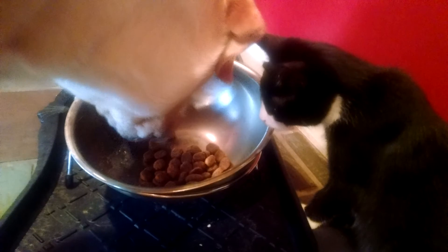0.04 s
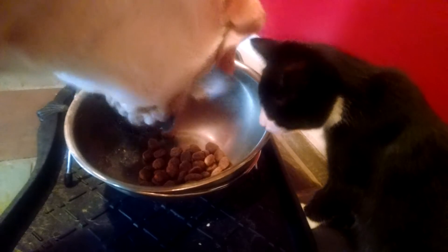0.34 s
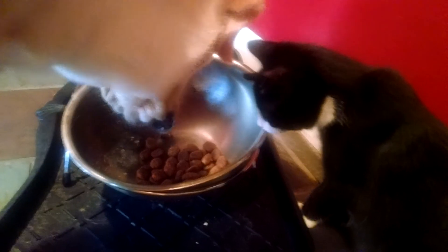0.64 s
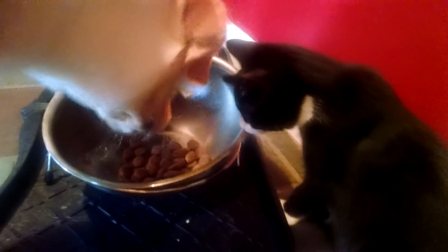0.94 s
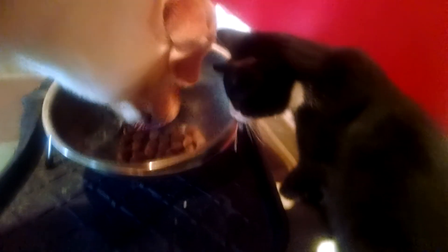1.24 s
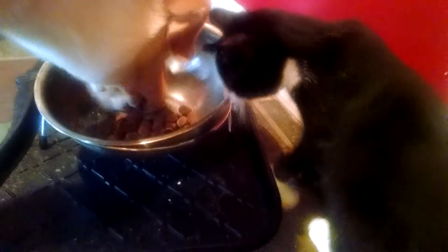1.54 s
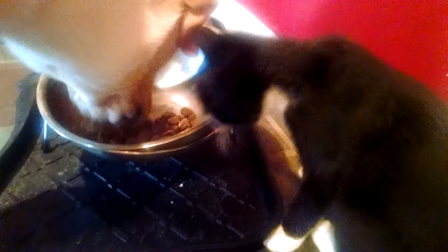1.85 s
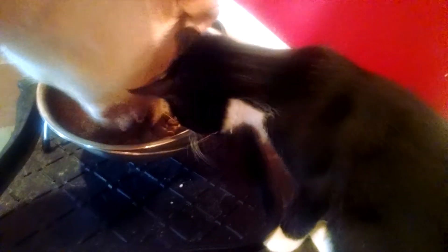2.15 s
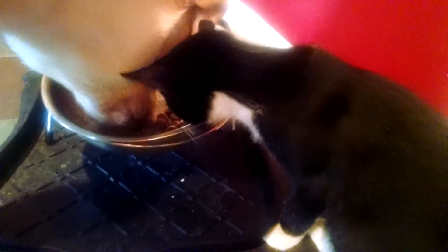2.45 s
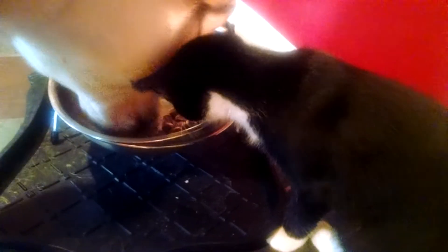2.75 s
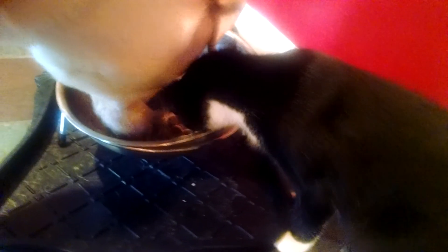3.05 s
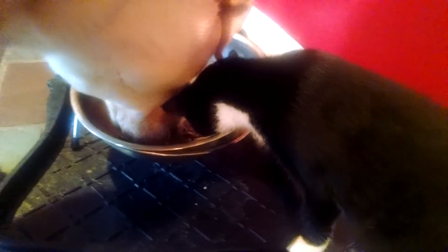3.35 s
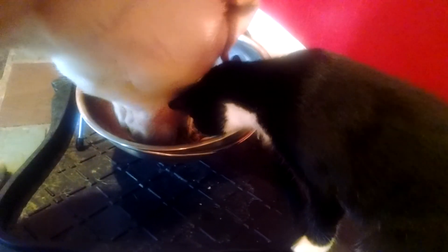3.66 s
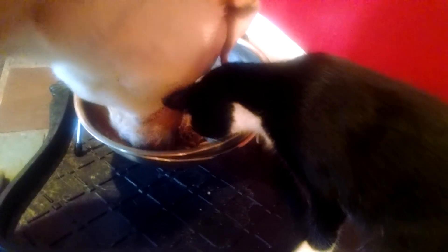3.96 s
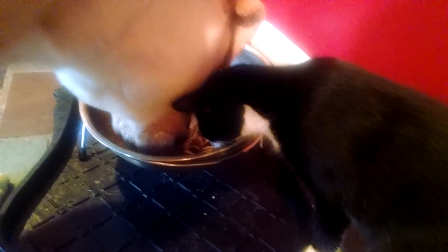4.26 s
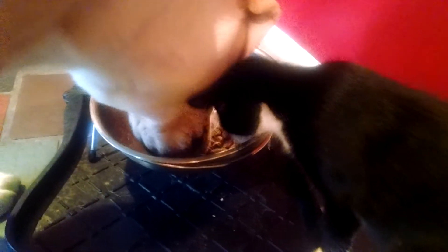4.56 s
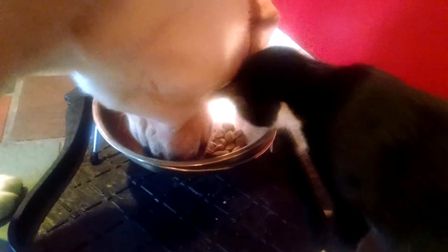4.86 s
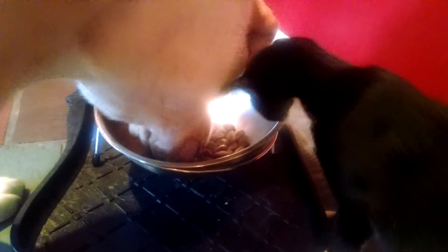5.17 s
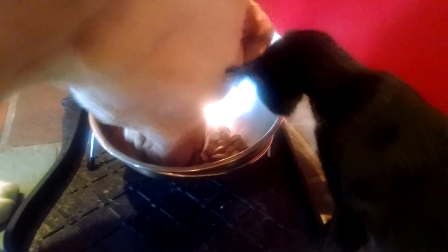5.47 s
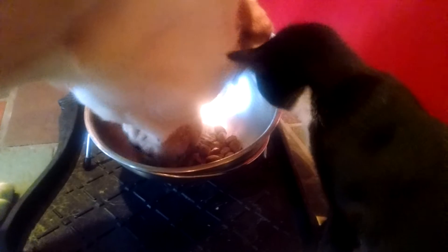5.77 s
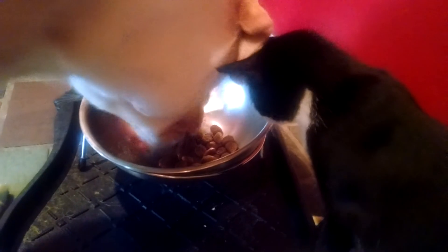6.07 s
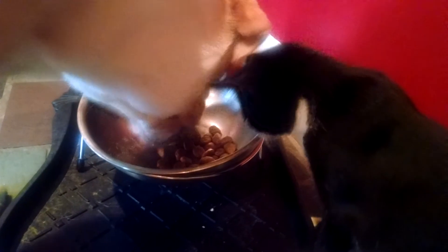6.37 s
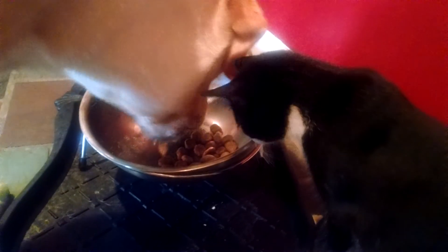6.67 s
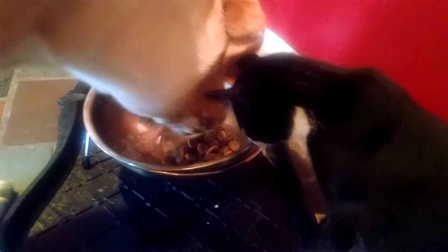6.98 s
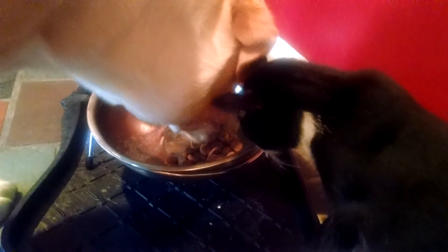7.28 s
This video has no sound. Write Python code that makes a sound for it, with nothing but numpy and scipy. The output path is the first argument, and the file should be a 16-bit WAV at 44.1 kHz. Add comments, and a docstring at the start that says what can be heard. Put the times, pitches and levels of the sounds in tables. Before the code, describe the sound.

A dog eats dry kibble from a steel bowl, close to the microphone in a small room. Wet lip clicks and soft tongue thumps come first, then crisp, irregular crunching as pellets knock, tumble and scrape against the metal with short, damped rings. One loud jaw clack lands about midway. Toward the end the crunching gives way to wet smacking. An appliance hums faintly throughout.

```python
"""A dog crunches dry kibble from a steel bowl on a mat, close to a phone in a small room.
Each pellet splits, snaps and crumbles between its teeth; its jaws clack, ringing the mouth cavity,
and saliva clicks on its lips. Pellets knock, tumble and scrape in the food-damped bowl; tongue and
fur thump and rub softly. An appliance hums behind it. The phone ducks its gain after a very loud
clack and widens the stereo image."""
import sys
import numpy as np
from scipy import signal
from scipy.fft import rfft, irfft, next_fast_len
from scipy.io import wavfile
from scipy.ndimage import uniform_filter1d

SR = 44100
rng = np.random.default_rng(int(sys.argv[2]) if len(sys.argv) > 2 else 0)


def materialize(psi):
    """Save the field psi as 16-bit PCM at rate SR to the path in sys.argv[1].

    A 1-D psi becomes a single channel; in a 2-D psi each row is a channel.
    """
    bounded = np.clip(np.atleast_2d(psi).T, -1, 1)
    quanta = np.round(bounded * 32767).astype(np.int16)
    wavfile.write(sys.argv[1], SR, quanta)


N = 332073
TIME = np.arange(N) / SR
HIT = np.arange(8192) / SR  # time within one impact [s]


def undb(db):
    """Decibels to amplitude."""
    return 10 ** (np.asarray(db) / 20)


def unit(x):
    """Scale to rms 1."""
    return x / np.sqrt(np.mean(x ** 2))


def add(track, start_s, sound):
    """Mix a sound into a track."""
    i = max(int(start_s * SR), 0)
    track[i:i + len(sound)] += sound[:N - i]


def convolve(x, response):
    """Apply an impulse response, keeping the length."""
    return signal.oaconvolve(x, response)[:len(x)]


def colour(x, points, size=4096):
    """Minimum-phase filter through (frequency [Hz], gain [dB]) points; keeps white-noise power."""
    hz, db = np.transpose(points)
    bins_hz = np.maximum(np.fft.rfftfreq(size, 1 / SR), 1)
    gain = undb(np.interp(np.log(bins_hz), np.log(hz), db))
    cepstrum = irfft(np.log(gain))
    cepstrum[1:size // 2] *= 2
    cepstrum[size // 2 + 1:] = 0
    response = irfft(np.exp(rfft(cepstrum)))
    return convolve(x, response / np.linalg.norm(response))


def grains(rate_hz, spread_db, even_s):
    """Random tiny impacts of unequal size, power held near 1 over even_s."""
    x, slots = np.zeros(N), N // 10
    chance, size, place, sign = rng.random((4, slots))
    size_db = spread_db * np.minimum(-np.log(1 - size), 2 * np.pi)
    onsets = ((np.arange(slots) + place) * 10).astype(int)
    x[onsets] = (chance < 10 * rate_hz / SR) * undb(size_db) * np.sign(sign - 0.5)
    span = int(even_s * SR)
    power = uniform_filter1d(uniform_filter1d(x ** 2, span), span)
    return x / np.sqrt(np.maximum(power, 1e-6))


def flicker(depth_db, samples):
    """Random gain, rms 1, smoothed over the given samples."""
    wander = unit(uniform_filter1d(rng.standard_normal(N), samples))
    return unit(undb(depth_db * wander))


def stroke(start_s, length_s, rise_s=0.0073, fade_s=0.026):
    """Envelope of one movement: rise up to start_s, hold, decay."""
    rise = np.clip(1 + (TIME - start_s) / rise_s, 0, 1)
    return rise * np.exp(-np.clip((TIME - start_s - length_s) / fade_s, 0, 20))


def aftermath(events, share_db, fade_s):
    """Power of the loose bits that each event sets moving."""
    kicks = np.zeros(N)
    for start_s, db, *_ in events:
        kicks[int(start_s * SR)] += undb(db + share_db) ** 2
    return signal.lfilter([1], [1, -np.exp(-2 / (fade_s * SR))], kicks)


# diffuse stereo width: (frequency [Hz], side re mid [dB])
DIFFUSE_WIDTH = [(40, 7.5), (100, -3.5), (330, -1), (700, -8), (1200, -16.5), (1900, 1.5), (2600, -11),
                 (3300, 3.5), (5000, -5), (8500, -0.5), (12800, -5.5), (15000, -6)]
def spread(mid, side):
    """Diffuse sound at two microphones, most alike in the midrange."""
    hz = np.fft.rfftfreq(len(side), 1 / SR)
    side_gain = undb(np.interp(hz, *np.transpose(DIFFUSE_WIDTH)))
    side = irfft(rfft(side) * side_gain, len(side))
    return np.array([mid + side, mid - side])


def room(x, early_db, early_t60_s, late_db, late_t60_s):
    """Direct sound, quick reflections from bowl, floor and wall, and a short tail."""
    t = TIME[:SR // 2]
    echoes = 0
    for db, t60_s in ((early_db, early_t60_s), (late_db, late_t60_s)):
        pattern = rng.standard_normal((2, len(t))) * (t > 0.0025) * undb(-60 * t / t60_s)
        echoes = echoes + undb(db) * pattern / np.linalg.norm(pattern, axis=1, keepdims=True)
    taper = 1 - (t / t[-1]) ** 2
    pair = spread(echoes[0], 1.46 * echoes[1]) * taper
    return x + np.array([convolve(x, response) for response in pair])


# room noise: (frequency [Hz], density [dB])
AIR_SPECTRUM = [(20, 0), (48, 3.5), (65, -15.5), (90, 7.5), (150, 0), (220, 6), (400, 3), (600, 8),
                (900, -2.5), (1600, -10.5), (2600, -16.5), (3600, -15), (9000, -25.5), (15200, -13.5),
                (15800, -86)]
# appliance tones: (frequency [Hz], level [dB])
HUM_TONES = [(88.5, -52), (119, -53.5), (178.5, -57), (247.6, -57.5), (359.5, -55), (470, -59),
             (586, -54.5)]
def background():
    """Steady room noise and the wavering hum of an appliance."""
    air = spread(*(colour(noise, AIR_SPECTRUM) for noise in rng.standard_normal((2, N))))
    hum = np.zeros(N)
    for hz, db in HUM_TONES:
        wander_rad = np.cumsum(rng.standard_normal(N)) * 0.01275
        hum += np.sqrt(2) * undb(db) * np.sin(2 * np.pi * hz * TIME + wander_rad)
    return undb(-45) * air + hum * np.array([[0.85], [1.1]])


# soft friction: (frequency [Hz], density [dB])
RUB_SPECTRUM = [(80, -20), (200, 10.5), (310, 11.5), (450, -2.5), (800, -3), (1300, 1), (2500, -50),
                (6000, -54)]
# rubs: (start [s], length [s], level [dB])
RUB_STROKES = [(0.378, 0.041, -44), (0.508, 0.05, -45.5), (0.595, 0.052, -58), (2.365, 0.11, -45),
               (6.2, 0.2, -48), (6.54, 0.15, -44.5), (7.024, 0.085, -46)]
def rustle(idle_db=-54.5):
    """Tongue, jowls and fur rub: single strokes over slight constant movement."""
    power = sum((undb(db) * stroke(start_s, length_s)) ** 2 for start_s, length_s, db in RUB_STROKES)
    friction = colour(grains(rate_hz=900, spread_db=1.5, even_s=0.032), RUB_SPECTRUM)
    return friction * np.sqrt(power + undb(idle_db) ** 2)


# tongue thumps: (time [s], level [dB], pitch [Hz])
TONGUE_THUMPS = [(0.384, -34.5, 620), (0.424, -36, 228), (0.597, -37, 305), (0.616, -34, 283),
                 (.646, -40, 303), (0.675, -35, 283), (.802, -32.5, 242), (.832, -40, 260),
                 (2.42, -37, 175)]
def licks():
    """The tongue lands on the food: a dull thump and a wet rub."""
    out = np.zeros(N)
    envelope = (1 - np.exp(-HIT / 0.0013)) * np.exp(-HIT / 0.012)
    envelope /= envelope.max()
    for start_s, db, hz in TONGUE_THUMPS:
        thump = np.sin(2 * np.pi * hz * HIT)
        rub = unit(colour(rng.standard_normal(len(HIT)), RUB_SPECTRUM))
        add(out, start_s, undb(db) * envelope * (0.55 * thump + 0.53 * rub))
    return out


def hollow(x, hz, width_hz):
    """Cavity resonance with a moving centre; rms 1."""
    carrier = np.exp(2j * np.pi * np.cumsum(hz) / SR)
    pole = np.exp(-np.pi * width_hz / SR)
    return unit(np.real(carrier * signal.lfilter([1], [1, -pole], x / carrier)))


# pellets dragged on steel: (start [s], length [s], level [dB], from [Hz], to [Hz])
PELLET_DRAGS = [(1.657, 0.26, -46.5, 650, 716), (2.06, 0.13, -41, 745, 660),
                (3.756, 0.046, -50.5, 720, 630), (5.359, 0.063, -39, 676, 635),
                (5.458, 0.11, -47, 724, 620), (5.82, 0.033, -38.5, 707, 624), (6.628, 0.053, -49, 704, 635)]
def scrapes():
    """Dragged pellets ring the hollow between muzzle and bowl; its pitch slides as the muzzle moves."""
    out = np.zeros(N)
    drag = grains(rate_hz=550, spread_db=-2, even_s=0.02)
    for start_s, length_s, db, from_hz, to_hz in PELLET_DRAGS:
        end_s = start_s + length_s
        span = slice(int((start_s - 0.036) * SR), int((end_s + 0.15) * SR))
        hz = np.interp(TIME[span], [start_s, end_s], [from_hz, to_hz])
        ring = hollow(drag[span], hz, width_hz=32)
        overtone = undb(-14) * hollow(drag[span], 1.42 * hz, width_hz=64)
        out[span] += undb(db) * (ring + overtone) * stroke(start_s, length_s)[span]
    return out


# loaded steel bowl: (frequency [Hz], level [dB], t60 [s])
BOWL_MODES = [(626, 1.5, 0.36), (646, 4.5, 0.16), (690, 1, 0.98), (910, -1, 0.21), (987, -1.5, 0.5),
              (1004, 11.5, 0.076), (1111, -2, 0.22), (1270, 1, 0.03), (1444, -0.5, 0.029),
              (1537, 8.5, 0.042), (1750, 6.5, 0.03), (2217, 4, 0.035)]
def bowl_ring(favoured_hz, octaves, scatter_db, damp_s):
    """One blow: the contact point weights the modes, the food soaks up the first swing."""
    hz, db, t60_s = np.transpose(BOWL_MODES)[:, :, None]
    weight, detune, polarity = rng.standard_normal((3, len(BOWL_MODES), 1))
    gain = undb(db + scatter_db * weight) / (1 + (np.log2(hz / favoured_hz) / octaves) ** 2)
    tones = np.sin(2 * np.pi * hz * (1 + 0.015 * detune) * HIT)
    modes = np.sign(polarity) * gain * undb(-60 * HIT / t60_s) * tones
    ring = modes.sum(0) * (0.2 + np.exp(-HIT / damp_s))
    return ring / np.linalg.norm(ring)


def rim_clink(start_s=4.536, peak_db=-24):
    """A tooth catches the bare, barely damped rim: a narrow group of modes sings on."""
    out = np.zeros(N)
    ring = bowl_ring(favoured_hz=1120, octaves=0.12, scatter_db=0, damp_s=0.2)
    add(out, start_s, undb(peak_db) * ring / np.abs(ring).max())
    return out


# muzzle pushes and chews: (start [s], length [s], stirring [dB], grinding [dB])
BITES = [(.2, 0.21, -70, -55.5), (.36, 0.099, -50.5, -76), (1.257, 0.18, -69, -55.5),
         (1.565, 0.1, -47, -52.5), (1.972, 0.018, -62, -45), (2.07, 0.22, -42.5, -48),
         (2.405, 0.29, -52, -52.5), (2.749, 0.093, -45, -47.5), (2.941, 0.052, -47, -46.5),
         (3.136, 0.023, -39, -45.5), (3.197, 0.14, -44, -42.5), (3.439, 0.09, -38.5, -45.5),
         (3.592, 0.056, -42, -41.5), (3.77, 0.023, -35, -40.5), (3.916, 0.18, -53, -50),
         (4.038, 0.083, -38, -45.5), (4.455, 0.031, -49.5, -52.5), (4.61, 0.02, -45, -56),
         (4.795, 0.17, -48, -47.5), (5.025, 0.053, -48, -42.5), (5.148, 0.22, -38, -46),
         (5.475, 0.054, -42, -60), (5.533, 0.011, -33.5, -36), (5.793, 0.053, -43, -55),
         (6.069, 0.031, -35, -66), (6.6, 0.035, -47, -51), (6.73, 0.24, -51.5, -59),
         (6.9, 0.13, -43.5, -59), (7.173, 0.13, -46.5, -74)]
def shuffle(places=7, idle_db=-54.5):
    """Pellets, moved by bites, knocks and jaw clacks, tap the bowl and click on each other."""
    taps = [grains(rate_hz=130, spread_db=6, even_s=0.15) for _ in range(places)]
    rings = sum(convolve(tap, bowl_ring(600, octaves=2.5, scatter_db=5, damp_s=0.004)) for tap in taps)
    contacts = undb(-11.5) * colour(sum(taps), CONTACT_SPECTRUM)
    pushed = sum((undb(db) * stroke(start_s, length_s, rise_s=0.036, fade_s=0.075)) ** 2
                 for start_s, length_s, db, _ in BITES)
    knocked = aftermath(BOWL_KNOCKS, share_db=-17, fade_s=0.015)
    jolted = aftermath(JAW_SMACKS, share_db=-29.5, fade_s=0.054)
    return unit(rings + contacts) * np.sqrt(pushed + knocked + jolted + undb(idle_db) ** 2)


# hard contact of tooth or pellet: (frequency [Hz], density [dB])
CONTACT_SPECTRUM = [(500, 7), (1800, 6.5), (2800, 4.5), (3800, 6.5), (5500, 1.5), (8000, -2), (11000, -2.5),
                    (15000, 4), (16200, -20)]
def tick(decay_s, spectrum=CONTACT_SPECTRUM):
    """Short snap of coloured noise, peak near 1."""
    envelope = np.exp(-HIT / decay_s)
    snap = colour(rng.standard_normal(len(HIT)) * envelope, spectrum)
    return 0.5 * unit(snap) * np.sqrt(np.mean(envelope ** 2))


# pellets and teeth on the bowl: (time [s], level [dB], favoured frequency [Hz])
BOWL_KNOCKS = [(0.9448, -28, 660), (1.0185, -30.5, 690), (1.635, -23.5, 1040), (1.6688, -21.5, 1070),
               (1.692, -22, 1060), (1.732, -26.5, 670), (1.778, -24.5, 765), (1.843, -31.5, 840),
               (1.954, -25.5, 766), (1.973, -20.5, 740), (2.057, -16.5, 890), (2.119, -25, 1000),
               (2.1382, -10, 745), (2.193, -19.5, 730), (2.258, -25, 970), (2.52, -26.5, 930),
               (2.575, -27.5, 680), (2.931, -30, 670), (3.1335, -17.5, 1060), (3.169, -19.5, 1035),
               (3.309, -29, 934), (3.322, -21.5, 975), (3.484, -30, 590), (3.515, -37, 1010),
               (3.578, -20.5, 604), (3.7568, -8.5, 990), (3.8087, -26, 957), (4.0611, -13, 1066),
               (4.495, -26, 1210), (4.63, -26.5, 1220), (4.876, -26.5, 1045), (5.025, -25, 1060),
               (5.14, -25, 1130), (5.222, -24, 980), (5.321, -31, 1080), (5.364, -25, 960),
               (5.393, -17, 1005), (5.468, -26, 720), (5.512, -21, 990), (5.552, -28, 620),
               (6.173, -14, 687), (6.575, -15, 613), (6.621, -14, 760), (6.651, -20.5, 1000),
               (7.057, -27.5, 660)]
def knocks():
    """Blows on the bowl: a quick local swing, the ring and a contact tick."""
    out = np.zeros(N)
    for start_s, db, hz in BOWL_KNOCKS:
        swing = (1 - np.exp(-HIT / 0.0005)) * np.exp(-HIT / 0.004) * np.sin(2 * np.pi * hz * HIT)
        ring = bowl_ring(hz, octaves=0.55, scatter_db=2.5, damp_s=0.06)
        contact = tick(decay_s=0.0014)
        add(out, start_s, undb(db) * (undb(-1.5) * swing + undb(11) * ring + undb(-9) * contact))
    return out


# saliva snap: (frequency [Hz], density [dB])
SALIVA_SPECTRUM = [(800, -1), (2500, -34), (3800, 15.5), (6000, -1), (10000, 29), (15200, 13), (16200, -25)]
# wet clicks: (time [s], level [dB], ping [Hz])
LIP_CLICKS = [(0.0408, -16, 14300), (.171, -19, 14000), (0.6376, -24.5, 3960), (0.646, -25, 3900),
              (0.9465, -10, 14400), (1.0181, -19, 7300), (1.177, -26, 6740), (1.3533, -25.5, 6500),
              (1.5118, -20, 5800), (2.69, -21.5, 6540), (3.99, -29, 7000), (4.62, -20, 6100),
              (4.966, -29, 7000), (6.032, -19.5, 6340), (6.302, -20, 6440), (6.718, -21, 8300),
              (6.721, -16, 14200), (6.7403, -18, 6800), (6.9842, -16, 13800), (7.1175, -17.5, 8500),
              (7.150, -20.5, 4360), (7.3024, -22, 4230)]
def clicks():
    """Saliva films snap as lips and tongue part: a sharp ping over a faint tick."""
    out = np.zeros(N)
    for start_s, db, hz in LIP_CLICKS:
        ping = np.exp(-HIT / 0.00017) * np.sin(2 * np.pi * hz * HIT)
        add(out, start_s, undb(db) * (ping + 0.5 * tick(decay_s=0.00015, spectrum=SALIVA_SPECTRUM)))
    return out


# wet slap: (frequency [Hz], density [dB])
SLAP_SPECTRUM = [(100, -40), (400, 2), (700, -13), (1600, 19), (2100, 4.5), (2800, 10.5), (4000, -27)]
# jaw closures: (time [s], level [dB], cavity [Hz], decay [s], swell [s], thud [dB], teeth [dB])
JAW_SMACKS = [(1.521, -25, 2070, 0.0005, 0.00036, -22, 3.5), (2.472, -28, 1650, 0.0015, 0.0006, -6, -18),
              (2.757, -30.5, 2050, 0.0045, 0.0011, -26, -20), (3.579, -21, 1490, 0.0012, 0.00057, -19, 0),
              (4.2166, 0.5, 1510, 0.00038, 0.00047, -11.5, -8),
              (4.533, -11, 1150, 0.0016, 0.0069, -32, -10), (4.533, -17.5, 1770, 0.0011, 0.0032, -5, -12),
              (5.8126, -13.5, 1220, 0.001, 0.00023, -29, -16), (6.058, -22, 1480, 0.00075, 0.0003, -25, -9),
              (6.086, -13, 1470, 0.0003, 0.00016, -38, -18), (6.104, -27, 1410, 0.0044, 0.0019, 2, -15),
              (6.1738, -18.5, 1440, 0.0034, 0.00031, 5.5, -31),
              (6.458, -26.5, 1630, 0.0021, 0.00027, -10, -6.5),
              (6.5352, -10, 1590, 0.00053, 0.00043, -4, -0.5),
              (6.5752, -16.5, 1360, 0.00061, 0.00016, -1.5, 1.5),
              (6.621, -12.5, 1070, 0.00086, 0.00091, -5, -2.5), (6.65, -23, 990, 0.0024, 0.012, -4, -5),
              (6.918, -41, 1450, 0.0099, 0.009, -9, 8), (6.985, -26, 1520, 0.0024, 0.00048, 6, -6),
              (7.025, -24.5, 1520, 0.0021, 0.00096, 0, -7), (7.235, -37.5, 1110, 0.0068, 0.003, -4, -4)]
def smacks():
    """The jaws shut: the mouth cavity rings over a dull thud, a wet slap and a tick of teeth."""
    out = np.zeros(N)
    thud_tones = np.sin(2 * np.pi * 470 * HIT) + 0.38 * np.sin(2 * np.pi * 275 * HIT)
    thud = undb(-4.5) * (1 - np.exp(-HIT / 0.0021)) * np.exp(-HIT / 0.0098) * thud_tones
    for start_s, db, hz, decay_s, swell_s, thud_db, teeth_db in JAW_SMACKS:
        envelope = (1 - np.exp(-(HIT / swell_s) ** 2)) * np.exp(-HIT / decay_s)
        wetness = 1 - np.exp(-decay_s / 0.0096)  # quick: clean pulse; slow: wet noise
        drift_rad = np.cumsum(rng.standard_normal(len(HIT))) * 0.038
        cavity = envelope / envelope.max() * np.sin(2 * np.pi * hz * HIT + drift_rad)
        slap = tick(3.2 * decay_s, SLAP_SPECTRUM)
        teeth = tick(0.00026 + 1.77 * decay_s)
        mouth = np.sqrt(1 - wetness) * cavity + 3.34 * wetness * slap
        add(out, start_s, undb(db) * (mouth + undb(thud_db) * thud + undb(teeth_db) * teeth))
    return out


def fragment_ring(hz, modes=3):
    """A hard fragment clinks: a main mode and weaker scattered ones, each with a one-cycle decay."""
    detune, phase = rng.standard_normal((2, modes, 1))
    order = np.arange(modes)[:, None]
    modes_hz = np.minimum(hz * 2 ** (0.18 * detune * (order > 0)), SR / 3)
    rings = np.exp(-HIT * modes_hz) * np.sin(2 * np.pi * modes_hz * HIT + phase)
    return (rings / (1 + order)).sum(0)


def crumbs(sizes=5, idle_db=-60.5):
    """Grinding catches and slips while fragments tick, louder in each bite and after each crack."""
    grit = grains(rate_hz=1000, spread_db=-4, even_s=0.055)
    ticks = sum(convolve(grains(rate_hz=22, spread_db=3.5, even_s=0.51), fragment_ring(hz))
                for hz in np.geomspace(3400, 13500, sizes))
    catching = flicker(depth_db=3, samples=400)
    grinding = colour(grit * catching + 0.76 * unit(ticks), FRACTURE_SPECTRUM)
    chewed = sum((undb(db) * stroke(start_s, length_s, rise_s=0.036, fade_s=0.032)) ** 2
                 for start_s, length_s, _, db in BITES)
    debris = aftermath(PELLET_CRACKS, share_db=-19, fade_s=0.018)
    return undb(-3) * grinding * np.sqrt(chewed + debris + undb(idle_db) ** 2)


# breaking kibble: (frequency [Hz], density [dB])
FRACTURE_SPECTRUM = [(600, -20), (1900, -12.5), (2800, -18), (3800, -12), (4800, -6), (5500, 1.5),
                     (7400, -1), (8600, -5), (11200, -2), (12300, -8), (13700, -1), (15400, -2.5),
                     (15750, -33)]
# pellets between the teeth, and at 4.536 s the bright tick of a tooth on the bowl rim: (time [s], level [dB],
# ring [Hz], treble tilt [dB], crumble decay [s])
PELLET_CRACKS = [(1.6714, -32.5, 4630, -2, 0.013), (1.6918, -30, 6250, 0, 0.019),
                 (1.9475, -20.5, 5450, -2, 0.012), (1.967, -28, 5450, 0, 0.0071),
                 (2.057, -25, 6850, -9, 0.0055), (2.139, -29, 5800, -1, 0.0064),
                 (2.1935, -20.5, 4740, -5.5, 0.0031), (2.2584, -16.5, 5500, -4.5, 0.006),
                 (2.468, -22, 6350, -9, 0.0068), (2.576, -33.5, 6500, -12, 0.017),
                 (2.7533, -30, 4000, -19, 0.014), (2.793, -38, 5450, -5, 0.0026),
                 (2.864, -33, 6360, 0, 0.0053), (2.973, -37, 8000, 7, 0.024),
                 (3.192, -22.5, 8900, -7.5, 0.0095), (3.217, -29, 5460, 1, 0.0067),
                 (3.272, -31.5, 7000, 9, 0.021), (3.321, -43, 9000, 10, .014),
                 (3.4352, -31.5, 6100, -7, 0.011), (3.5792, -13, 6060, 4, 0.0028),
                 (3.6168, -23.5, 6200, 2, 0.01), (3.78, -29, 6550, -12, 0.004),
                 (3.8084, -19, 5100, -15.5, 0.0029), (4.0193, -28.5, 14000, 10, 0.0033),
                 (4.0403, -29, 14200, -1, 0.028), (4.06, -26, 6900, -20, 0.0061),
                 (4.536, -28.5, 6050, 9, 0.0025), (4.824, -22, 6230, 4, 0.0032),
                 (5.0307, -31.5, 5970, -3, 0.009), (5.2256, -11.5, 8300, -1, 0.0055),
                 (5.2603, -24, 6000, 6, 0.01), (5.488, -31.5, 8150, -3, 0.0029),
                 (5.535, -27, 4200, -27, 0.0035), (5.5785, -27, 6100, -2, 0.0088),
                 (5.6106, -17, 6000, 5.5, 0.0079), (5.858, -33, 6760, 3, 0.0078)]
def cracks(split_s=0.0019, break_lag_s=0.0014, break_s=0.0009):
    """Each pellet splits, snaps in two, then crumbles in tiny fractures that ring at its own pitch."""
    out = np.zeros(N)
    since_break = HIT - break_lag_s
    split = undb(-10) * np.exp(-HIT / split_s)
    snap = split + undb(2) * (since_break > 0) * np.exp(-np.abs(since_break) / break_s)
    for start_s, db, hz, treble_db, crumble_s in PELLET_CRACKS:
        noise, size = rng.standard_normal((2, len(HIT)))
        crumble = undb(-6.5) * np.exp(-HIT / crumble_s)
        clumps = unit(undb(4.5 * unit(uniform_filter1d(size, size=24))))  # sub-millisecond bursts
        fractures = noise * np.hypot(snap, crumble * clumps)
        ring = signal.lfilter(*signal.iirpeak(hz, Q=4, fs=SR), fractures)
        crunch = unit(unit(fractures) + 0.6 * unit(ring))
        crunch = colour(crunch, [(3000, -treble_db), (14000, treble_db)], size=256)
        crunch = colour(crunch, FRACTURE_SPECTRUM, size=512)
        crunch = unit(crunch) * np.sqrt(np.mean(snap ** 2 + crumble ** 2))
        tooth = undb(2) * tick(decay_s=0.0005)
        add(out, start_s, undb(db) * (tooth + crunch))
    return out


def scene():
    """Crunching, lips, jaws and bowl, each with its share of the room, over the background."""
    crunch = room(cracks() + crumbs(), early_db=-5.5, early_t60_s=0.018, late_db=-9, late_t60_s=0.31)
    lips = room(clicks(), early_db=-16, early_t60_s=0.03, late_db=-18, late_t60_s=0.12)
    jaws = room(smacks(), early_db=-6.5, early_t60_s=0.061, late_db=-12.5, late_t60_s=0.43)
    bowl = knocks() + rim_clink() + shuffle() + scrapes() + licks() + rustle()
    bowl = room(bowl, early_db=-9, early_t60_s=0.043, late_db=-9, late_t60_s=0.046)
    return background() + bowl + lips + jaws + crunch


def gain_control(x, threshold_db=-18.5, cut_db_per_db=0.69, recover_db_per_s=27.5, smooth_s=0.031):
    """Gain drops after a very loud clack, then creeps back."""
    power = uniform_filter1d(np.mean(x ** 2, axis=0), size=128)
    over_db = np.maximum(10 * np.log10(np.maximum(power, 1e-12)) - threshold_db, 0)
    recovery_db = recover_db_per_s * TIME
    held_db = np.maximum.accumulate(over_db + recovery_db) - recovery_db
    pole = np.exp(-1 / (smooth_s * SR))
    return x * undb(-cut_db_per_db * signal.lfilter([1 - pole], [1, -pole], held_db))


# stereo widening: (frequency [Hz], left phase re right [rad])
WIDENING_PHASE = [(0, 0), (1920, 0.0), (2300, -3.1), (3080, -3.2), (3350, -6.2), (4300, -6.3), (4700, -9.4),
                  (5280, -9.5), (7480, -15.6), (8050, -15.9), (8520, -18.8), (9400, -19.8), (10200, -22.0),
                  (10600, -22.5), (15100, -34.5), (16400, -34.6)]
def record(dry):
    """The phone rides its gain, widens the image by interchannel phase and cuts deep bass and top."""
    low_hz, top_hz = 38, 16400
    size = next_fast_len(N + SR // 10)
    phase_rad = np.interp(np.fft.rfftfreq(size, 1 / SR), *np.transpose(WIDENING_PHASE))
    rotation = np.exp(0.5j * phase_rad * np.array([[1], [-1]]))
    wide = irfft(rfft(gain_control(dry), size) * rotation, size)[:, :N]
    wide = signal.sosfilt(signal.butter(2, low_hz, "high", fs=SR, output="sos"), wide)
    return signal.sosfilt(signal.ellip(8, 0.2, 70, top_hz, fs=SR, output="sos"), wide)


dry = scene()
out = record(dry)
materialize(out)
```